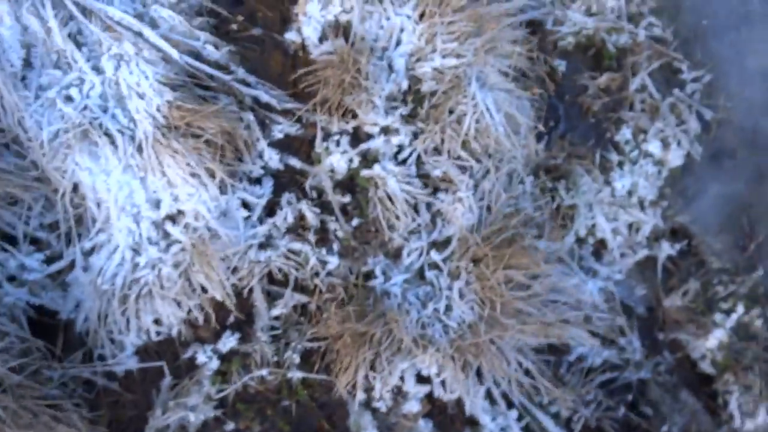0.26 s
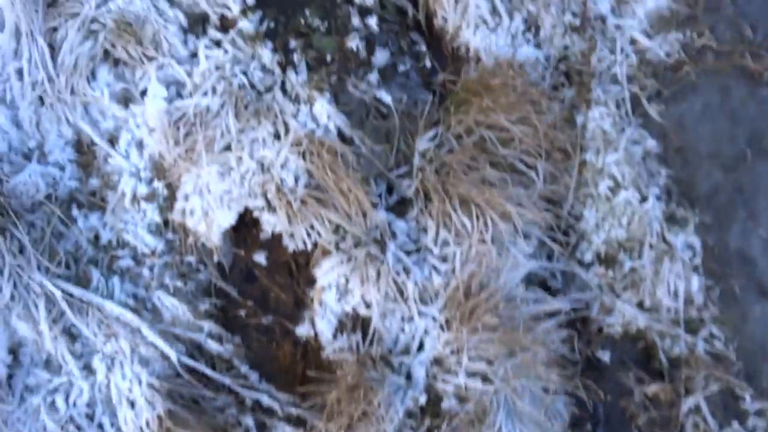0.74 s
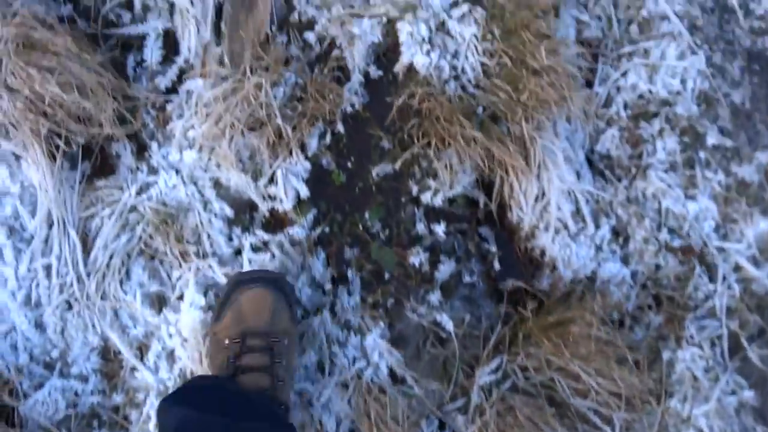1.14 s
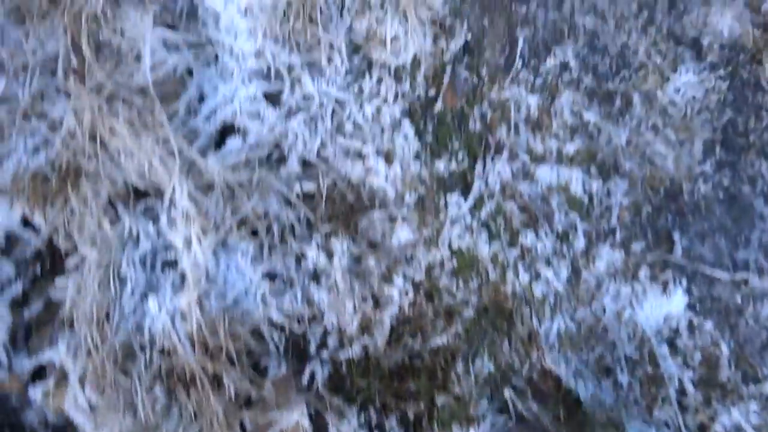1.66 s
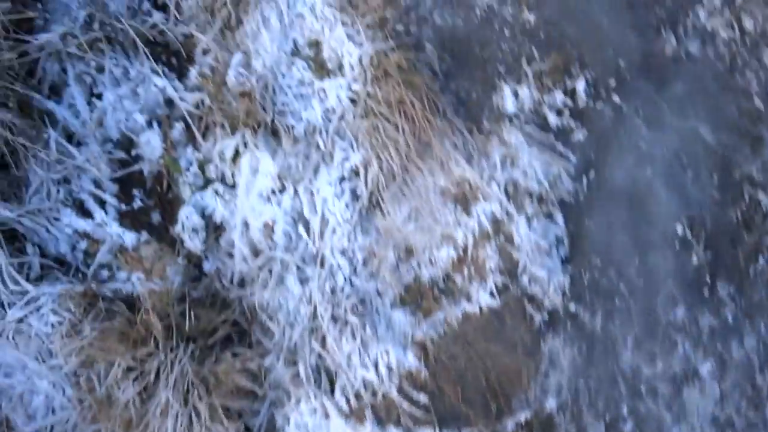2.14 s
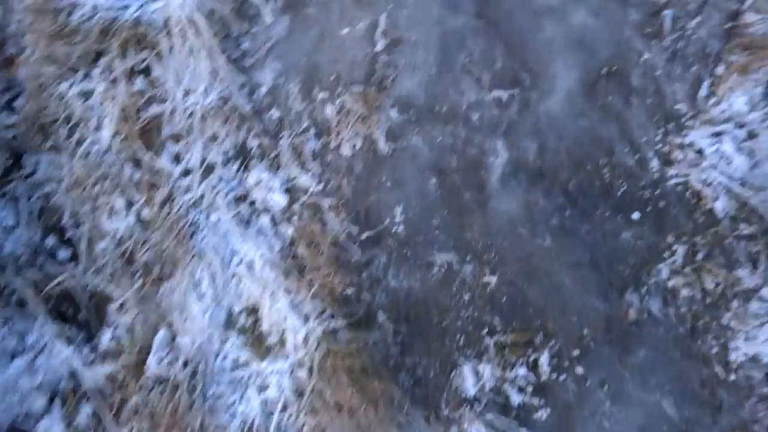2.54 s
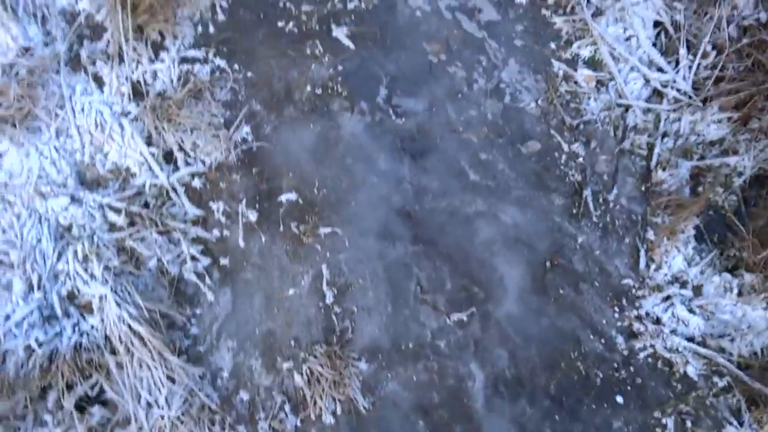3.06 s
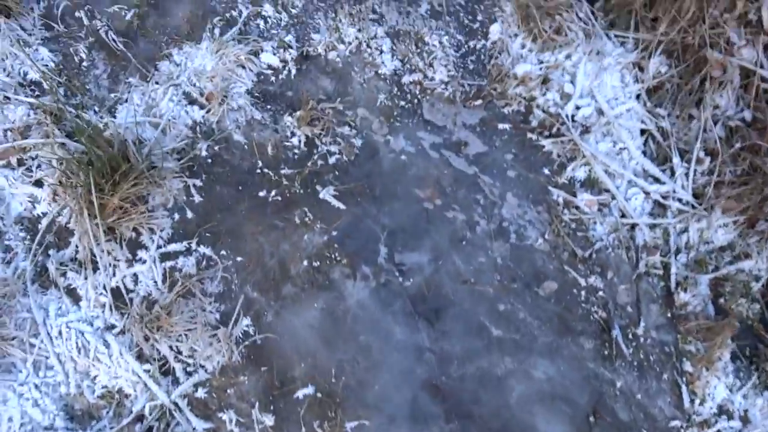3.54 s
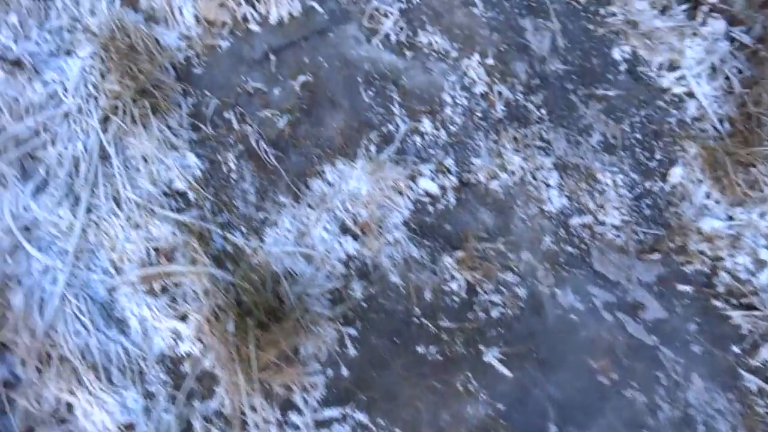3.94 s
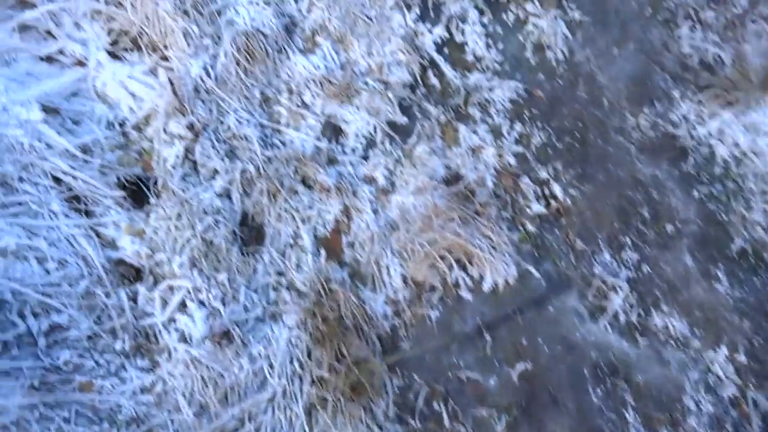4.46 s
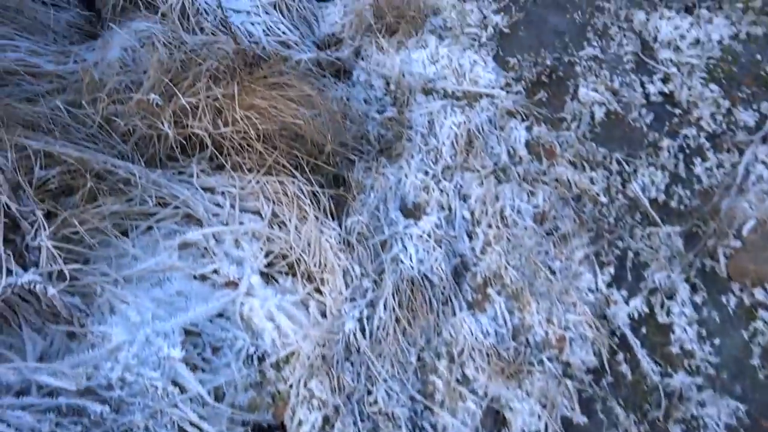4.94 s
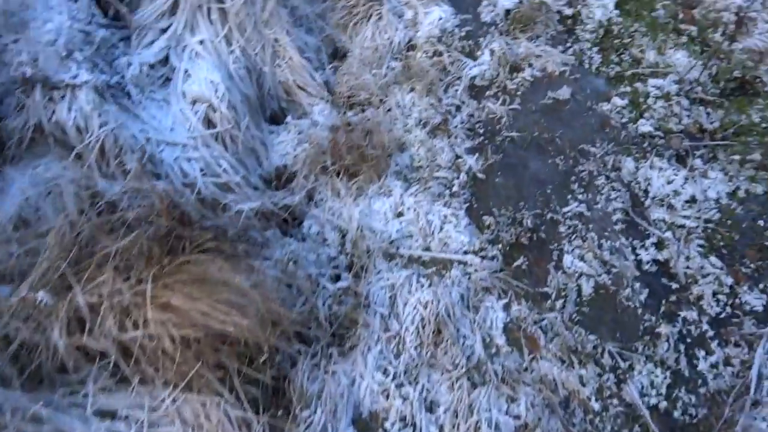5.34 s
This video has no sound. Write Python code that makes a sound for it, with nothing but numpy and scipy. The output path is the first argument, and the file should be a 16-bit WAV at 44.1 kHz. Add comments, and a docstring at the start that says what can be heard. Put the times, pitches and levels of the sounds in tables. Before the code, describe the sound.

Boots crunch briskly over frosty grass and frozen turf, with cracking ice, snapping blades and a faint brook trickling behind.

```python
"""Heard: crisp footsteps on frozen turf, cracking ice, snapping grass, a faint brook, early puffs of air; no echo.
Boots swing, land and roll: load curves drive dense random clicks, filtered as soil, crust, stalks and frost.
Ice plates and blades are filtered single clicks with a splinter trail; crackles and hollow turf are narrow bands.
The brook is chirped decaying sines over filtered clicks, fading slowly; air is low-pitched filtered noise."""
import sys
import numpy as np
from scipy import signal
from scipy.fft import rfft, irfft
from scipy.io import wavfile

SR = 44100
rng = np.random.default_rng(int(sys.argv[2]) if len(sys.argv) > 2 else 0)


def unload_audio(sound):
    """Save the sound as a 16-bit wav file, at the path given as the first command line argument."""
    columns = np.transpose(np.atleast_2d(sound))
    # keep every value between -1 and 1, then stretch to whole-number steps
    steps = np.round(np.clip(columns, -1, 1) * 32767)
    wavfile.write(sys.argv[1], SR, steps.astype(np.int16))


N = 247401
TIME_S = np.arange(N) / SR

# Boot swinging through grass. Each row: end in seconds, length in seconds,
# crust, frost and stalk load at the end in dB.
SWING_ROWS = [(0.385, 0.13, -46, -44, -54.5), (0.477, .07, -44.5, -41.5, -47.5),
              (0.565, 0.041, -36, -31, -40), (1.114, 0.12, -50.5, -49, -59), (1.179, .04, -33, -34, -41),
              (1.79, 0.15, -58, -51, -54), (1.851, 0.0086, -38, -37, -43), (2.39, 0.24, -46.5, -54, -51.5),
              (2.428, 0.016, -38, -35, -37.5), (2.89, .16, -54.5, -67, -73),
              (3.159, 0.13, -49.5, -38, -49.5), (3.304, 0.18, -40.5, -50, -51.5),
              (3.545, 0.097, -48.5, -57, -69), (3.804, 0.12, -40, -46.5, -52.5),
              (4.28, 0.14, -47, -50.5, -63.5), (4.502, .12, -38, -36, -45),
              (4.952, 0.11, -47, -54.5, -62.5), (5.15, 0.14, -39.5, -40.5, -48),
              (5.472, 0.091, -43, -51, -56.5)]
# Heel or sole coming down. Each row: centre in seconds, bell half length in seconds, crust load in dB,
# frost load in dB, boom of the hollow turf in dB, boom pitch in Hz.
FOOTFALL_ROWS = [(0.577, 0.011, -31.5, -25, -29, 826), (1.216, 0.0073, -51, -25.5, -46, 398),
                 (1.273, 0.0087, -27, -36, -36.5, 457), (1.666, 0.012, -46.5, -42.5, -51, 306),
                 (1.869, 0.011, -27, -31, -40, 220), (1.926, 0.017, -36.5, -38.5, -54, 294),
                 (2.47, 0.01, -30, -26.5, -30, 626), (3.115, 0.021, -60, -46, -46, 480),
                 (3.161, 0.018, -33, -42, -57, 466), (3.82, 0.029, -33.5, -35.5, -34, 490),
                 (3.844, 0.0057, -31.5, -28.5, -51, 137), (4.473, 0.0062, -34.5, -39, -36, 660),
                 (4.526, 0.0079, -35, -30.5, -49, 387), (5.138, .014, -41, -36.5, -38, 540),
                 (5.226, 0.024, -39, -45, -58, 397)]
# Weight rolling over the sole. Each row: start in seconds, length in seconds, release in seconds,
# crust load in dB, frost load in dB.
ROLL_ROWS = [(0, 0.16, 0.067, -40, -40), (.59, 0.16, .03, -35, -32), (0.762, 0.041, 0.061, -41, -39.5),
             (1.199, .11, 0.046, -33, -28), (1.369, 0.13, 0.053, -34.5, -32.5),
             (1.567, 0.12, 0.046, -43.5, -41.5), (1.968, 0.081, 0.038, -41, -42),
             (2.5, 0.087, 0.037, -37.5, -36), (3.32, 0.058, 0.066, -36.5, -45.5),
             (3.884, 0.055, 0.054, -35.5, -41), (4.005, 0.063, 0.035, -39, -46),
             (4.584, 0.026, 0.075, -35.5, -37), (5.232, 0.059, 0.07, -43, -48),
             (5.488, 0.16, .03, -44, -54)]
# How much the soil gives: soft in the turf, hard along the ice. Each row: time in seconds, soil over crust in dB.
SOIL_GIVE = [(0, -11.5), (1.3, -12), (1.95, -13), (2.15, -2.5), (2.5, -9.5), (3.35, -13), (4.1, -17.5),
             (4.7, -14.5), (5.55, -16)]
# Spectrum of one fracture in each material. Each row: frequency in Hz, relative gain in dB.
SOIL_SPECTRUM = [(30, -22), (70, -48), (120, -24.5), (180, -3.5), (300, 3.5), (430, 7), (560, 9.5),
                 (800, -62.5), (2000, -57)]
CRUST_SPECTRUM = [(90, -71.5), (300, -18.5), (450, -13), (600, -1), (900, 0), (1350, -1.5), (1800, -6),
                  (2400, -11), (4000, -46), (12000, -33)]
STALK_SPECTRUM = [(500, -36), (1400, -16), (2200, 2), (3300, 3.5), (4500, -0.5), (6500, -11.5),
                  (14000, -18)]
FROST_SPECTRUM = [(800, -86), (3000, -11), (5000, -1), (7000, 1), (9000, 2), (13000, 4.5), (15500, -6.5)]
# Ice plates breaking. Each row: time in seconds, relative peak in dB, pitch in Hz.
ICE_CRACKS = [(.6555, -14, 1010), (.6888, -17, 940), (.7434, -20, 925), (.7594, -17, 990),
              (.8334, -20.5, 1130), (1.0708, -23.5, 1080), (1.088, -17, 1830), (1.1605, -8.5, 1040),
              (1.2688, -12, 890), (1.3762, -2.5, 1220), (1.4234, -17.5, 1810), (1.568, -16, 814),
              (1.7329, -27, 1780), (1.9105, -25, 1190), (1.9258, -16, 1290), (2.32, -26, 1940),
              (2.3447, -23, 1100), (2.3835, -26, 1020), (2.4582, -11.5, 720), (2.5108, -21, 1250),
              (3.5422, -28.5, 1350), (3.6607, -23, 1066), (3.677, -25.5, 1270), (4.321, -24.5, 1150),
              (4.4678, -11.5, 870), (4.9221, -30, 1690), (5.0095, -24, 1570), (5.2278, -19.5, 890),
              (5.4992, -24, 1240)]
# Frozen blades snapping. Each row: time in seconds, relative peak in dB, pitch in Hz.
BLADE_SNAPS = [(.0405, -17.5, 6730), (.1156, -25, 7000), (.1236, -17, 11180), (.1395, -18, 7800),
               (.3482, -22.5, 8700), (.3756, -25, 11000), (.6406, -25, 10180), (.6914, -17, 6520),
               (.8345, -19, 5000), (.866, -19, 10400), (1.1094, -21.5, 7540), (1.1461, -10.5, 7680),
               (1.2135, -14, 3300), (1.4235, -17.5, 7540), (1.5673, -20.5, 10290), (2.1156, -34, 4190),
               (2.2109, -28.5, 3300), (2.3039, -25, 3630), (2.3199, -29, 4300), (2.3435, -31.5, 5260),
               (2.383, -37, 3460), (3.516, -29, 10400), (4.2921, -30, 9250), (4.5767, -25, 7550)]
# Spectrum of one break. Each row: multiple of its pitch, relative gain in dB.
ICE_SHAPE = [(.06, -43), (.15, -24), (.3, -24.5), (.55, -4.5), (.85, 2.5), (1.25, -1.5), (1.7, -16),
             (3, -22.5), (10, -27.5)]
BLADE_SHAPE = [(.05, -34.5), (.22, -35), (.45, -4.5), (.82, -3), (1, 2), (1.2, -5.5), (1.9, -9.5), (4, -47)]
# Boot brushing powdery hoar frost. Each row: centre in seconds, bell half length in seconds, level in dB.
SWISH_ROWS = [(2.983, 0.019, -41.5), (3.093, 0.026, -40.5), (4.315, 0.037, -48), (4.416, 0.034, -33),
              (5.101, 0.015, -35.5)]
# Spectrum of powder grains. Each row: frequency in Hz, relative gain in dB.
POWDER_SPECTRUM = [(2000, -40), (5000, -5), (7500, -7), (10000, 2), (12000, 2), (15500, -6)]
# Wash of the brook. Each row: frequency in Hz, relative gain in dB.
WATER_SPECTRUM = [(25, -46), (90, -29), (170, -16.5), (350, -2), (650, -5.5), (1100, -8), (2000, -0.5),
                  (4000, -11.5), (8000, -16.5), (15500, -28)]
# Air on the microphone. Each row: centre in seconds, bell half length in seconds, level in dB,
# eddy pitch in Hz, share that differs between the ports from 0 to 1.
PUFF_ROWS = [(0.707, .014, -32, 122, 0.25), (0.757, 0.01, -45, 111, 0.2), (0.782, 0.0054, -44, 107, 0.13),
             (0.843, 0.0099, -51, 90, 0.03), (0.867, 0.0076, -55, 70, .1), (1.087, 0.016, -57, 70, 0.1),
             (1.11, 0.0046, -50, 101, 0.1)]
# Microphone response. Each row: frequency in Hz, gain in dB.
MIC_RESPONSE = [(20, -3), (80, 0.5), (13400, 0), (14400, 2.5), (15500, -13)]

SWING_GROWTH_DB, SWING_ATTACK_S, SWING_RELEASE_S = 6, 0.037, 0.028  # growth from first touch to the end
ROLL_ATTACK_S, ROLL_SAG_DB_PER_S = 0.018, 25.5
SETTLE_DB, SETTLE_RELEASE_S = -18.5, 0.37  # trodden grass creaks on after the weight has left
STALKS_DB, THINNING_DB_PER_S = -4.5, 0.94  # stalks against the mean of crust and frost; they thin out
CRUST_TOP_HZ, STALK_TOP_HZ = 1650, 5426  # splinter pitch limits
TOP_HZ = 15750


def undb(db):
    """Decibels to gain."""
    return 10 ** (np.asarray(db) / 20)


def unit(x):
    """Scale to rms 1."""
    return x / np.sqrt(np.mean(x ** 2))


def add(track, start_s, sound):
    """Mix a short sound into a track."""
    start = max(int(start_s * SR), 0)
    track[start:start + len(sound)] += sound[:max(N - start, 0)]


def colour(x, points, size=2048):
    """Minimum-phase filter from (Hz, dB) points: clicks keep their sharp front."""
    hz, db = np.transpose(points)
    log_hz = np.log(np.fft.rfftfreq(size, 1 / SR) + 1)
    log_gain = np.log(undb(np.interp(log_hz, np.log(hz), db)))
    # fold the cepstrum onto positive time
    cepstrum = irfft(log_gain)[:size // 2]
    cepstrum[1:] *= 2
    impulse_response = irfft(np.exp(rfft(cepstrum, size)))
    return signal.fftconvolve(x, impulse_response)[:N]


def walk(rate_hz):
    """Random levels joined by straight lines; rms about 0.86."""
    return 1.05 * np.interp(TIME_S * rate_hz, np.arange(N // 10), rng.standard_normal(N // 10))


def clicks(rate_hz, scatter_db):
    """Random clicks of either sign: many small ones, a few large."""
    size = undb(scatter_db * np.minimum(rng.exponential(size=N), 5))
    struck = rng.random(N) < rate_hz / SR
    return struck * rng.choice([-1, 1], N) * size


def swell(centre_s, half_s):
    """Bell-shaped rise and fall."""
    return np.exp(-.5 * ((TIME_S - centre_s) / half_s) ** 2)


def stereo(mid, side):
    """Left and right from their common and differing parts."""
    return np.array([mid + side, mid - side])


def stroke(start_s, length_s, attack_s, release_s):
    """Exponential attack, hold and release of one boot movement."""
    before_s = np.minimum(TIME_S - start_s, 0)
    after_s = np.maximum(TIME_S - start_s - length_s, 0)
    return np.exp(before_s / attack_s - after_s / release_s)


def stalk_level_db(at_s, crust_db, frost_db):
    """Stalks stand between crust and frost and break with both."""
    return (crust_db + frost_db) / 2 + STALKS_DB - THINNING_DB_PER_S * at_s


def loads():
    """Load on crust, frost and stalks: a swing grows, a footfall is a brief blow, a roll sags and settles."""
    power = np.zeros((3, N))
    for end_s, length_s, *levels_db in SWING_ROWS:
        growth = undb(SWING_GROWTH_DB * np.clip((TIME_S - end_s) / length_s, -1, 0))
        swing = growth * stroke(end_s - length_s, length_s, SWING_ATTACK_S, SWING_RELEASE_S)
        power += np.outer(undb(levels_db), swing) ** 2
    for at_s, half_s, crust_db, frost_db, _, _ in FOOTFALL_ROWS:
        levels_db = [crust_db, frost_db, stalk_level_db(at_s, crust_db, frost_db)]
        power += np.outer(undb(levels_db), swell(at_s, half_s)) ** 2
    for start_s, length_s, release_s, crust_db, frost_db in ROLL_ROWS:
        levels_db = [crust_db, frost_db, stalk_level_db(start_s, crust_db, frost_db)]
        sag = undb(-ROLL_SAG_DB_PER_S * np.clip(TIME_S - start_s, 0, length_s))
        pressing = stroke(start_s, length_s, ROLL_ATTACK_S, release_s)
        settling = undb(SETTLE_DB) * stroke(start_s, length_s, ROLL_ATTACK_S, SETTLE_RELEASE_S)
        power += np.outer(undb(levels_db), sag * np.hypot(pressing, settling)) ** 2
    return np.sqrt(power)


def crunch(spectrum, gain, rate_hz, scatter_db, side_db):
    """Fractures in one material; those beside the boot reach the two ports unequally."""
    hits = unit(clicks(rate_hz, scatter_db)) * gain
    mid = colour(hits, spectrum)
    side = colour(hits * rng.standard_normal(N), spectrum)
    filter_norm = np.sqrt(np.sum(colour(signal.unit_impulse(N), spectrum) ** 2))
    return stereo(mid, undb(side_db) * side) / filter_norm


def steps(crust, frost, stalks):
    """Boots crush crust, stalks and frost in jerks, and the soil gives under the crust."""
    soil = crust * undb(np.interp(TIME_S, *np.transpose(SOIL_GIVE)))
    jerks = undb(1.73 * walk(130) + 0.33 * walk(700) - 0.45)
    return (crunch(SOIL_SPECTRUM, soil * jerks, rate_hz=690, scatter_db=4.0, side_db=-51)
            + crunch(CRUST_SPECTRUM, crust * jerks * undb(-1.02), rate_hz=2000, scatter_db=1.0, side_db=-23.5)
            + crunch(STALK_SPECTRUM, stalks * jerks * undb(1.55), rate_hz=4000, scatter_db=2.5, side_db=-20.5)
            + crunch(FROST_SPECTRUM, frost * jerks * undb(0.5), rate_hz=12000, scatter_db=3.0, side_db=-103))


def ring_band(x, hz, width, order):
    """Narrow band-pass around one pitch, scaled to rms 1."""
    band = signal.butter(order, [hz / (1 + width), hz * (1 + width)], "band", fs=SR, output="sos")
    return unit(signal.sosfilt(band, x))


def crackles(crust, frost, stalks, low_hz=900, high_hz=11000, width=0.048, rate_hz=24,
             scatter_db=2.0, crackle_db=-7.5, count=36):
    """Brittle splinters ping briefly by size: big ones in the crust, smaller in stalks, tiny in the frost."""
    out = np.zeros(N)
    for hz in np.geomspace(low_hz, high_hz, count):
        if hz < CRUST_TOP_HZ:
            load = crust
        elif hz < STALK_TOP_HZ:
            load = stalks
        else:
            load = frost
        # the tiny offset avoids dividing by zero without clicks
        out += load * ring_band(clicks(rate_hz, scatter_db) + 1e-18, hz, width, order=1)
    return out * undb(crackle_db) / np.sqrt(count / 3)  # crackle_db is per three bands


def hollows(width=0.2, linger=1.22):
    """The frozen crust bridges soft ground; each footfall rings the gap for a moment."""
    out = np.zeros(N)
    for at_s, half_s, _, _, boom_db, hz in FOOTFALL_ROWS:
        out += undb(boom_db) * swell(at_s, linger * half_s) * ring_band(clicks(3000, 1), hz, width, order=2)
    return out


def fractures(table, shape, splinter_db, splinter_s, side_db, size=2048):
    """Each break is one dry click, coloured by its pitch, with a short decaying trail of splinters."""
    out, age_s = np.zeros((2, N)), np.arange(size) / SR
    for at_s, peak_db, hz in table:
        splinters = rng.standard_normal(size) ** 3 * np.exp(-age_s / splinter_s)
        force = signal.unit_impulse(size) + undb(splinter_db) * splinters / np.linalg.norm(splinters)
        sound = colour(force, [(hz * multiple, gain_db) for multiple, gain_db in shape])
        sound *= undb(peak_db) / np.abs(signal.hilbert(sound)).max()
        add(out[0], at_s, sound)
        add(out[1], at_s, sound * undb(side_db) * rng.standard_normal())
    return stereo(*out)


def strays(load, centre_hz, octaves, over_db, scatter_db, count):
    """Pieces break at random, louder under more load; rows are time in s, peak in dB, pitch in Hz."""
    place = rng.random(count)
    pitch, size = rng.standard_normal((count, 2)).T
    load_db = 20 * np.log10(load[(place * N).astype(int)] + 1e-9)
    peak_db = load_db + over_db + scatter_db * np.minimum(size, 2)
    hz = centre_hz * 2 ** (octaves * np.clip(pitch, -2, 2))
    return zip(place * N / SR, peak_db, hz)


def debris(crust, frost, stalks):
    """Stray ice chips follow the crust load, bits of blade the frost and stalk load."""
    chips = strays(crust, centre_hz=1170, octaves=0.27, over_db=13.5, scatter_db=1.5, count=70)
    bits = strays(np.sqrt(frost * stalks), centre_hz=5200, octaves=0.61, over_db=4, scatter_db=1.5, count=300)
    return (fractures(chips, ICE_SHAPE, splinter_db=-7.5, splinter_s=0.0018, side_db=-22)
            + fractures(bits, BLADE_SHAPE, splinter_db=5, splinter_s=0.0045, side_db=-55))


def swishes():
    """Powder grains are so fine and so many that they merge into a bright hiss."""
    gain = sum(undb(level_db) * swell(at_s, half_s) for at_s, half_s, level_db in SWISH_ROWS)
    return crunch(POWDER_SPECTRUM, gain, rate_hz=45000, scatter_db=4.0, side_db=-36)


def brook(rate_hz=190, centre_hz=980, octaves=.42, decay_cycles=12, start_db=-55.5, side_db=-4,
          receding_db_per_s=1.54):
    """Small bubbles ring and rise in pitch over the wash of water on stones; wide, slowly left behind."""
    bubbles, t = np.zeros((2, N)), np.arange(SR // 9) / SR
    for pitch, size, pan in rng.standard_normal((int(rate_hz * N / SR), 3)):
        start_s = rng.random() * N / SR
        hz = centre_hz * 2 ** (octaves * pitch)
        age = t * hz / decay_cycles
        envelope = undb(3 * size) * (1 - np.exp(-t * hz)) * np.exp(-age)
        rise = 1 + 0.0213 * np.minimum(age, 6)
        ring = envelope * np.sin(2 * np.pi * hz * t * rise)
        add(bubbles[0], start_s, ring)
        add(bubbles[1], start_s, ring * np.tanh(pan))
    flow = undb(0.53 * walk(25))
    mid, side = (unit(b) + flow * unit(colour(clicks(5000, 3.9), WATER_SPECTRUM)) for b in bubbles)
    return stereo(mid, undb(side_db) * side) * undb(start_db - receding_db_per_s * TIME_S)


def eddies(hz):
    """Turbulence at the ports: noise strongest near one low pitch, rms 1."""
    points = [(hz / 5, -26), (hz * 0.87, -1), (hz * 0.75, 0), (hz * 2.7, -9), (hz * 5, -28), (hz * 20, -65)]
    return unit(colour(rng.standard_normal(N), points))


def wind(start_db=-76, calming_db_per_s=5):
    """Eddies thump on the ports, over a faint rumble of moving air that dies away."""
    out = stereo(eddies(66), 0.26 * eddies(60)) * undb(start_db - calming_db_per_s * TIME_S)
    for at_s, half_s, level_db, hz, apart in PUFF_ROWS:
        common = np.sqrt(1 - apart) * eddies(hz)
        # smaller eddies differ between the ports
        differing = np.sqrt(apart) * eddies(1.6 * hz)
        out += undb(level_db) * swell(at_s, half_s) * stereo(common, differing)
    return out


def scene():
    """Steps, breaking ice and snapping grass close by; water and air around them."""
    crust, frost, stalks = loads()
    boots = undb(-0.6) * steps(crust, frost, stalks) + crackles(crust, frost, stalks) + hollows() + swishes()
    ice = fractures(ICE_CRACKS, ICE_SHAPE, splinter_db=-7, splinter_s=0.0039, side_db=-38)
    blades = fractures(BLADE_SNAPS, BLADE_SHAPE, splinter_db=3, splinter_s=0.0012, side_db=-13)
    breaks = undb(-1.5) * ice + undb(1.5) * blades + debris(crust, frost, stalks)
    return boots + breaks + brook() + wind()


def record(dry):
    """The microphone colours each channel, then the recorder cuts the top with a steep low-pass."""
    heard = np.array([colour(channel, MIC_RESPONSE) for channel in dry])
    return signal.sosfilt(signal.ellip(10, .2, 75, TOP_HZ, fs=SR, output="sos"), heard)


dry = scene()
out = record(dry)
unload_audio(out)
```